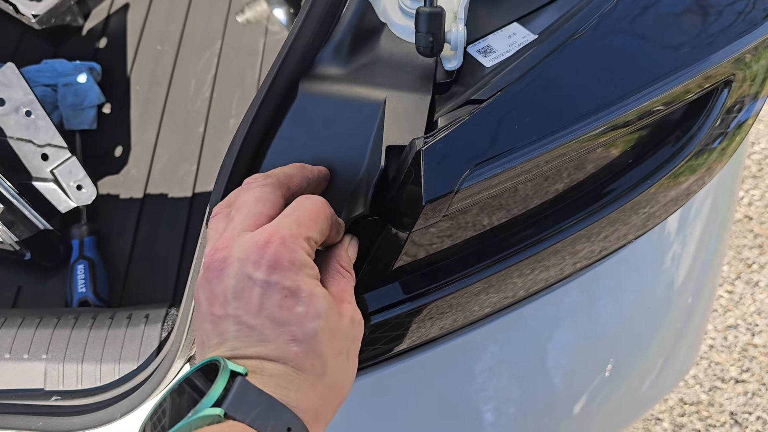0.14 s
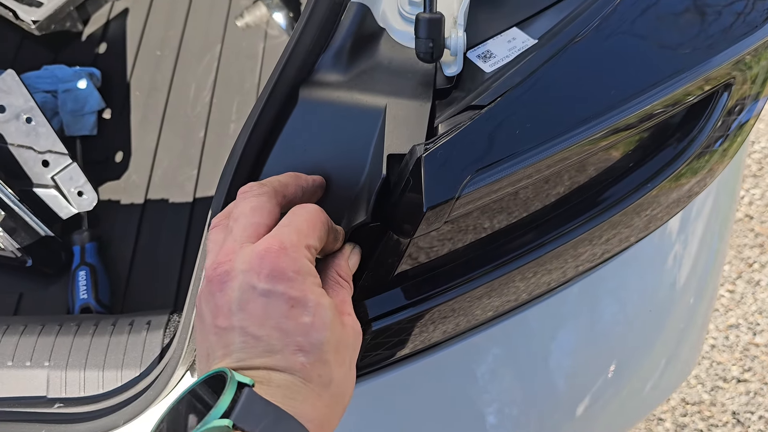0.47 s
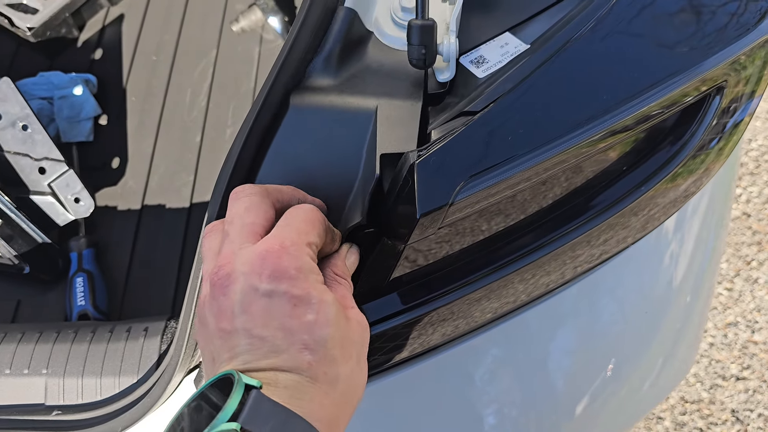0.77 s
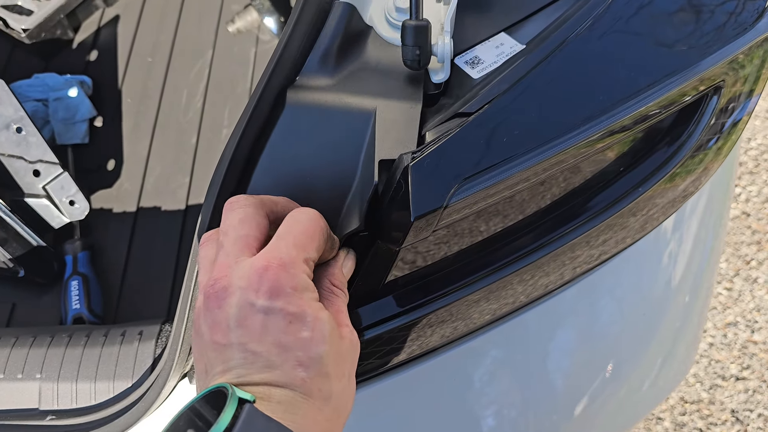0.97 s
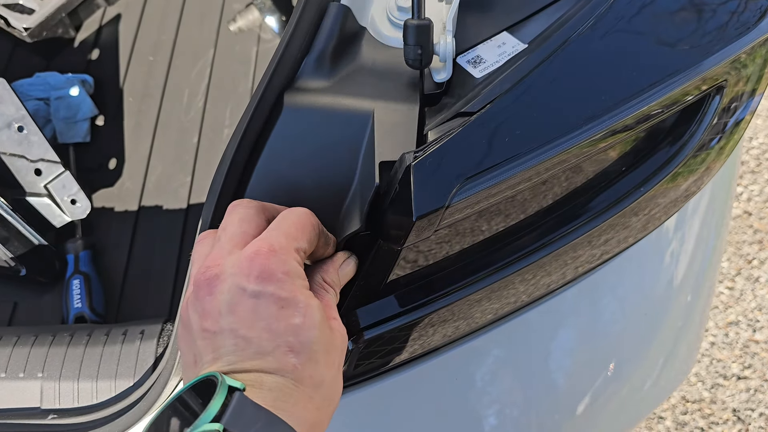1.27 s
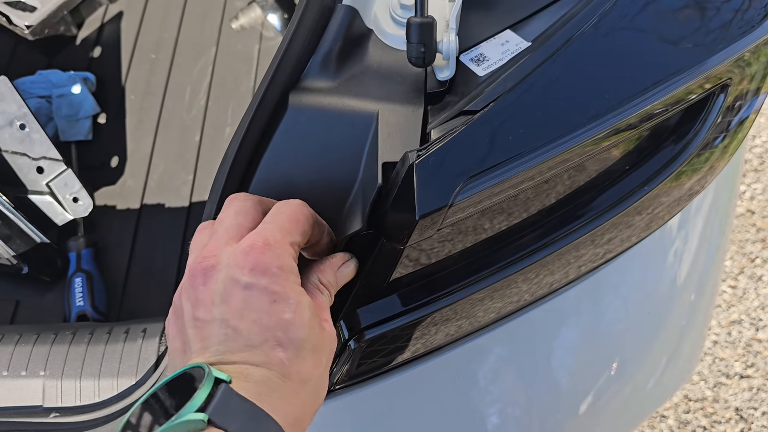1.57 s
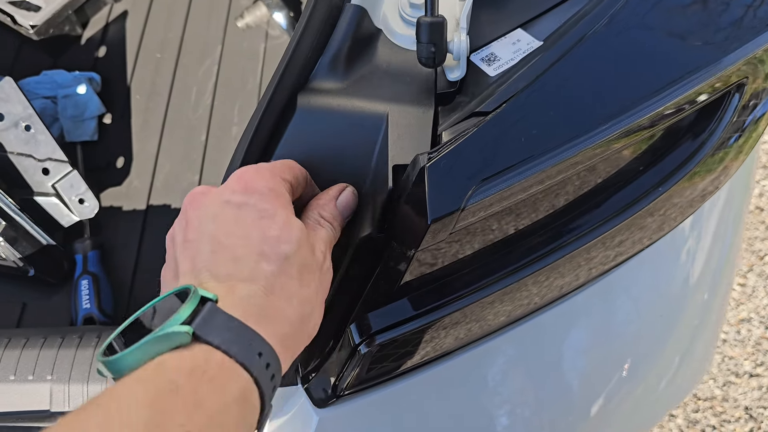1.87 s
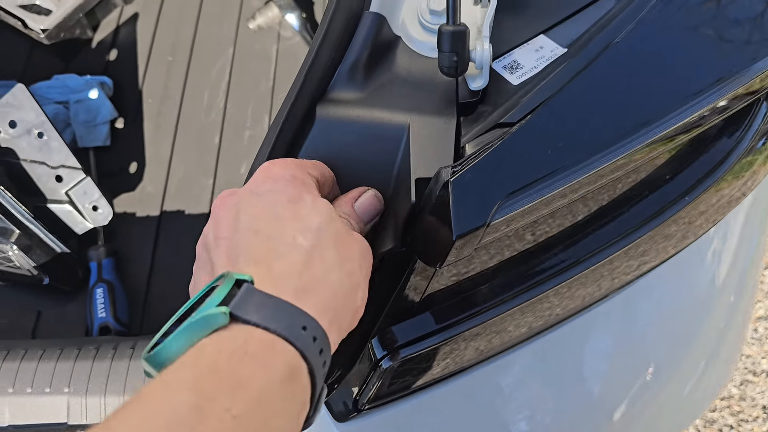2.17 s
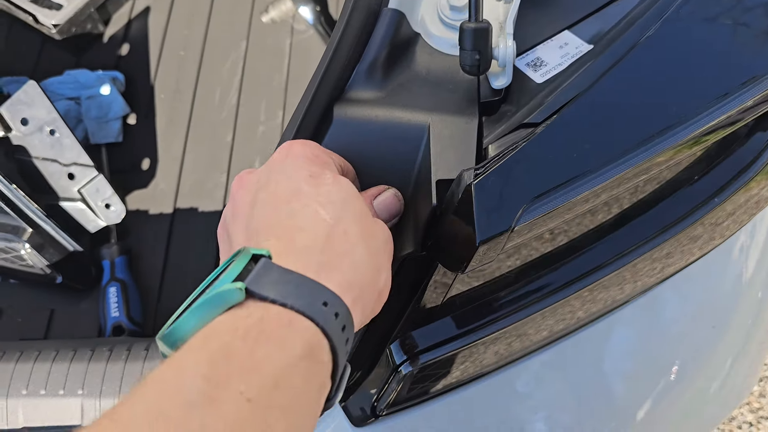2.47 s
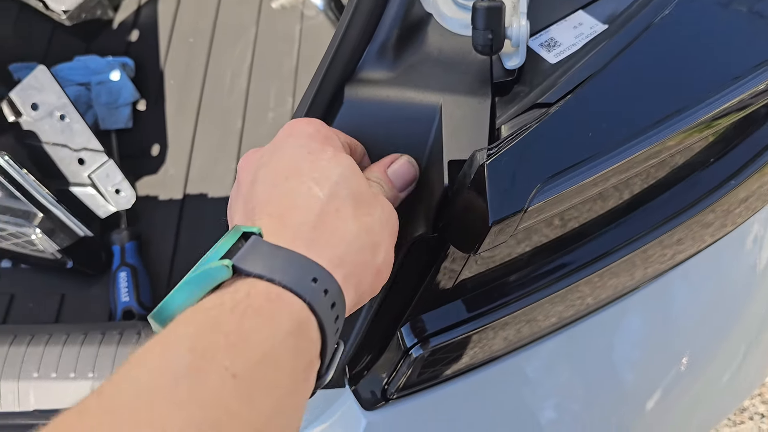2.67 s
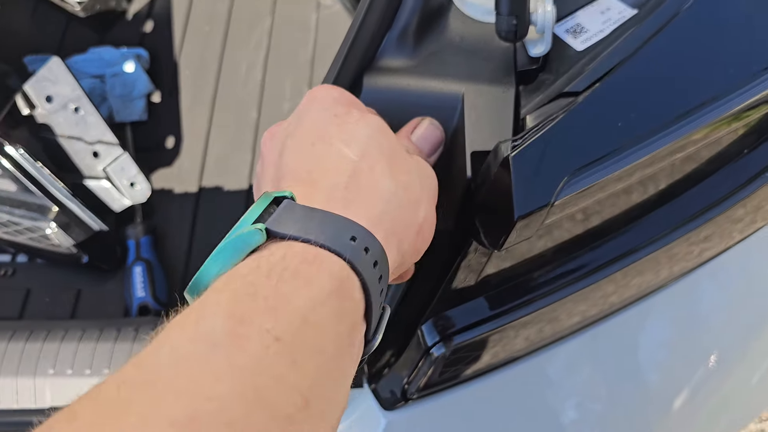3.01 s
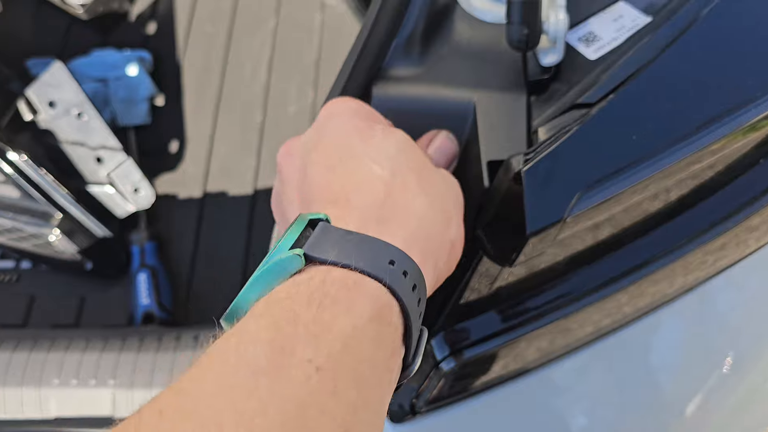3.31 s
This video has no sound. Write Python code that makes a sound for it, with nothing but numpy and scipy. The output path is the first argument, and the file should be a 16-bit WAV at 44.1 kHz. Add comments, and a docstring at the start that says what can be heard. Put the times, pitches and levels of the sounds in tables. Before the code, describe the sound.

Close to a phone at an open car boot, plastic trim knocks, creaks and rubs in bursts, then pauses before a sharp, loud clip click with a hollow thump; distant dove and songbird outdoors.

```python
"""Plastic trim pressed into a car boot

Outdoors at the open boot of a car, a hand presses a plastic trim cover into its clips, close to a phone.
Thumps and clicks are noise bursts ringing sets of dying modes; skin rubbing plastic is swelling, grainy hiss.
A dove and a songbird, wavering sines with echo, call far off over a low outdoor rumble of shaped noise."""
import sys
import numpy as np
from scipy import signal
from scipy.fft import rfft, irfft
from scipy.io import wavfile
from scipy.ndimage import uniform_filter1d

SR = 44100
rng = np.random.default_rng(int(sys.argv[2]) if len(sys.argv) > 2 else 0)


def put_to_file(sound):
    """Save the sound as 16-bit audio at rate SR, in the file named by the first command-line argument."""
    columns = np.atleast_2d(sound).T  # one column per channel
    safe = np.clip(columns, -1, 1)
    whole_steps = np.round(safe * 32767)
    wavfile.write(sys.argv[1], SR, whole_steps.astype(np.int16))


def volts_from_decibels(level):
    """Turn decibel levels (scalar or array-like) into linear amplitude factors."""
    exponent = np.asarray(level, float) / 20
    return 10 ** exponent


N = 152145


def evened(x):
    """Scales to rms 1."""
    return x / np.sqrt(np.mean(x ** 2) + 1e-20)


def slow_drift(count, width):
    """Twice-smoothed noise at rms 1, for slow wandering."""
    return evened(uniform_filter1d(uniform_filter1d(rng.standard_normal(count), width), width))


def read(points, hz):
    """Reads a table of values by frequency on a log axis."""
    f, value = np.transpose(points)
    return np.interp(np.log(hz + 1), np.log(f + 1), value)


def coloured(x, points):
    """Filters x by the spectrum in a table."""
    hz = np.fft.rfftfreq(x.shape[-1], 1 / SR)
    return irfft(rfft(x) * volts_from_decibels(read(points, hz)), x.shape[-1])


def tilted(x, slope_db):
    """Brighter or duller: a slope in dB per octave about 4 kHz, level outside 1 to 16 kHz."""
    return coloured(x, [(1000, -2 * slope_db), (16000, 2 * slope_db)])


def add(mix, s, sound, pan_db):
    """Mixes a sound in at time s; positive pan_db leans left."""
    part = mix[:, round(s * SR):][:, :len(sound)]
    part += volts_from_decibels([[pan_db / 2], [-pan_db / 2]]) * sound[:part.shape[1]]


# spectrum of the outdoor floor: pitch_hz, relative_level_db (per Hz)
AIR_SPECTRUM = [(12, -54), (20, -23), (35, -15), (60, 12), (117, -23), (151, -11), (402, -26), (1300, -35),
                (1850, -38), (2560, -39), (3400, -46), (15000, -61.5), (16300, -122)]
# rise and fall of the low rumble: time_s, level_db (only departures from the mean count)
RUMBLE_LEVEL = [(0.0, -63.5), (0.5, -61), (0.69, -61), (0.93, -61.5), (1.16, -55), (1.29, -58), (1.55, -65),
                (3.08, -60.5), (3.45, -61.5)]
# likeness of left and right: pitch_hz, correlation (-1 to 1)
LIKENESS = [(60, 0.99), (180, 0.95), (550, 0.28), (1650, -0.1), (4970, -0.25), (15000, 0.0049)]
# lean of the floor: pitch_hz, left_over_right_db
AIR_LEAN = [(60, 1.5), (240, 0.5), (950, 1), (3770, -3.5), (15000, 11.5)]
AIR_DB, PATCH_DB, SWELL_DB = -53, 1.0, 0.3  # overall rms; unevenness in time and pitch; slow swell


def air():
    """Outdoor floor: distant traffic rumble, wash and faint hiss, as patchy noise shaped in time and pitch."""
    frames, hz = N // 256 + 5, np.fft.rfftfreq(1024, 1 / SR)
    a, b, c, d, patches = rng.standard_normal((frames, 513, 5)).T
    patches = evened(uniform_filter1d(uniform_filter1d(patches, 10, 0), 12, 1))
    swell = evened(uniform_filter1d(rng.standard_normal(frames), 30))

    s, db = np.transpose(RUMBLE_LEVEL)
    change_db = np.interp(np.arange(frames) * 256 / SR, s, db) - db.mean()
    rumble = change_db / (1 + (hz[:, None] / 150) ** 2)  # mostly below 150 Hz

    same = np.clip(read(LIKENESS, hz), -1, 1)[:, None]
    left = a + 1j * b
    right = same * left + np.sqrt(1 - same ** 2) * (c + 1j * d)
    lean = volts_from_decibels(read(AIR_LEAN, hz)[:, None] / 2)
    z = np.array([left * lean, right / lean])
    z *= volts_from_decibels(read(AIR_SPECTRUM, hz)[:, None] + PATCH_DB * patches + SWELL_DB * swell + rumble)
    floor = signal.istft(z, nperseg=1024, noverlap=768)[1][:, :N]
    return volts_from_decibels(AIR_DB) * evened(floor)


def whistles(calls):
    """Near-pure gliding sines with soft 15 ms ends; each call is a list of (s, Hz, dB) points."""
    out = np.zeros((2, N))
    waver = 1 + 0.009 * slow_drift(N, 400)  # share by which the pitch wavers
    for call in calls:
        s, hz, db = np.transpose(call)
        t = np.arange(s[0], s[-1], 1 / SR)
        ends = np.clip(np.minimum(t - s[0], s[-1] - t) / 0.015, 0, 1)
        pitch = np.interp(t, s, hz) * waver[round(s[0] * SR):][:len(t)]
        tone = np.sqrt(2) * np.sin(2 * np.pi * np.cumsum(pitch) / SR)
        add(out, s[0], ends * volts_from_decibels(np.interp(t, s, db)) * tone, 1.0)
    return out


# songbird notes far off, before flutter: start_s, length_s, first_pitch_hz, last_pitch_hz, level_db
SONG_NOTES = [(.33, .05, 2130, 2200, -79), (.37, .06, 2500, 2400, -76), (.44, .11, 2380, 2450, -82),
              (.575, .095, 2660, 2640, -70), (.665, .055, 2850, 2200, -68), (.69, .1, 2430, 2500, -75),
              (.76, .055, 2980, 3020, -72), (.93, .08, 2700, 2750, -72), (2.405, .055, 2740, 2560, -72),
              (2.49, .045, 2530, 2500, -72), (2.555, .05, 2660, 2680, -72), (2.6, .045, 2450, 2260, -72),
              (2.82, .12, 2680, 2690, -70), (2.92, .04, 2500, 2270, -75), (2.96, .07, 2400, 2550, -75),
              (3.0, .18, 2680, 2630, -77)]


def songbird():
    """Short whistled notes, each gliding from its first pitch to its last."""
    notes = []
    for s, length, first_hz, last_hz, db in SONG_NOTES:
        notes.append([(s, first_hz, db), (s + length, last_hz, db)])
    return whistles(notes)


# dove coos far off, before flutter; each coo is a list of points: time_s, pitch_hz, level_db
DOVE_COOS = [
    [(.69, 514, -60), (.735, 505, -64), (.755, 587, -57.5), (.81, 598, -58.5), (.88, 480, -69)],
    [(1.53, 480, -64), (1.6, 492, -62), (1.75, 490, -61), (1.84, 480, -66)],
    [(2.74, 482, -66), (2.8, 488, -61), (2.94, 478, -64), (3.0, 480, -70), (3.15, 465, -70)],
]


def dove():
    """Low whistled coos whose pitch and level glide from point to point."""
    return whistles(DOVE_COOS)


def lingering(x, table):
    """Echo tail of sparse random taps, each band dying at its own speed (t60 by pitch)."""
    taps = np.zeros((2, SR))
    at = np.arange(160, SR - 20, 20) + rng.integers(0, 20, (2, (SR - 161) // 20))
    np.put_along_axis(taps, at, rng.choice([-1., 1.], at.shape), 1)
    taps[1] = 0.95 * taps[0] + 0.3 * taps[1]  # the two sides are much alike
    hz, t, z = signal.stft(taps, SR, nperseg=256)
    tail = signal.istft(z * volts_from_decibels(-60 * t / read(table, hz)[:, None]), SR, nperseg=256)[1]
    return signal.fftconvolve(x, tail / np.linalg.norm(tail, axis=1)[:, None], axes=1)[:, :N]


def far_birds():
    """Distant calls waver in level on the way and arrive with an echo."""
    song = songbird() + dove()
    song = song * volts_from_decibels(2.0 * slow_drift(N, 600))  # flutter, dB rms
    return song + volts_from_decibels(-2.5) * lingering(song, [(500, 0.6), (3000, 0.6)])  # t60 0.6 s throughout


# open boot ringing on: pitch_hz, t60_s
BOOT_DECAY = [(150, 0.43), (500, 0.13), (1500, 0.1), (4000, 0.085), (12000, 0.049)]


def boot(trim):
    """The open boot rings on after the close sounds, lows longest."""
    return volts_from_decibels(-11.5) * lingering(trim, BOOT_DECAY)


# skin sliding and plastic creeping, close by, before tilt and swell:
# start_s, length_s, level_db, rise_share (of the length), tilt_db_per_octave
RUB_SLIDES = [(0.0, 0.13, -64, 0.36, -5.3), (0.496, 0.048, -67, 0.43, 1.5), (0.58, 0.073, -64, 0.48, 0.5),
              (0.677, 0.035, -63, 0.37, 0.5), (0.755, 0.033, -62.5, 0.53, 0.5),
              (0.874, 0.042, -49.5, 0.69, -1.3), (0.912, 0.017, -40, 0.53, -2.5),
              (1.016, 0.033, -48.5, 1, -4.5), (1.043, 0.058, -50, 1, -2.5), (1.123, 0.15, -59.5, 0.56, -2),
              (1.256, 0.081, -46, 0.86, -3), (1.31, 0.0073, -34, 0.17, 5.8), (1.449, 0.05, -59, 0.3, -5.5),
              (1.546, 0.32, -71.5, 0.23, -10), (1.682, 0.091, -44.5, 0.78, 1),
              (1.774, 0.12, -52.5, 0.63, 0), (1.891, 0.065, -58, 0.37, 3.3), (2.646, 0.088, -57, 0.28, 4),
              (2.797, 0.068, -52.5, 0.53, 3), (2.842, 0.078, -60, 0.23, -2.2),
              (3.246, 0.098, -50, 0.17, -3), (3.265, 0.03, -49.5, 1, 0), (3.311, 0.34, -56, 0.71, 0.3)]
# spectrum of the rubbing hiss: pitch_hz, relative_level_db (per Hz)
RUB_SPECTRUM = [(110, -25), (200, -10), (400, 2), (900, -9.5), (1340, 1), (1750, -9), (2350, -0.5),
                (2900, -1), (3700, -10.5), (8000, -18.5), (14700, -26), (16300, -45)]
GRIP_DB, SLIPS_PER_S = 2.6, 700  # uneven grip, and rate of sudden small slips


def rubs():
    """Scratchy hiss of small slips that swells and fades with each slide."""
    grip = volts_from_decibels(GRIP_DB * evened(uniform_filter1d(rng.standard_normal(N), size=200)))
    slips = (rng.random(N) < SLIPS_PER_S / SR) * rng.exponential(1, N)
    grip = grip + signal.lfilter([1], [1, -0.95], slips)
    a, b = rng.standard_normal((2, N))
    hiss = evened(coloured(grip * np.array([a, 0.8 * a + 0.6 * b]), RUB_SPECTRUM))  # ports partly differ
    out = np.zeros((2, N))
    for s, length, db, rise, slope_db in RUB_SLIDES:
        n, at = round(length * SR), round(max(s, 0) * SR)
        peak = np.clip(rise, 0.05, 0.95)
        swell = np.sin(np.pi / 2 * np.interp(np.arange(n) / n, [0, peak, 1], [0, 1, 0]))
        out[:, at:at + n] += volts_from_decibels(db) * swell[:N - at] * tilted(hiss[:, at:at + n], slope_db)
    return out * volts_from_decibels([[0.75], [-0.75]])  # leans left


DETUNE, UNEVEN_DB = 0.038, 2.5  # blows land at different places: spread of mode pitch (share) and level
REACH_OCTAVES = 0.68  # a thump favours the modes near its centre


def ring(modes, drive_s, centre_hz=None):
    """A short dying shake rings a set of modes; loudest stretch at rms 1."""
    t = np.arange(SR // 3) / SR
    hz, db, t60 = np.repeat(np.transpose(modes), 2, axis=1)[:, :, None]  # each mode is a close pair
    band = [1.04 * hz.min(), hz.max()]
    if centre_hz:
        db = db - 6 * (np.log2(hz / centre_hz) / REACH_OCTAVES) ** 2
        band = [centre_hz / 1.63, centre_hz * 1.9]
    uneven, detune = rng.standard_normal((2, len(hz), 1))
    fading = volts_from_decibels(db + UNEVEN_DB * uneven - 60 * t / t60)
    body = (fading * np.sin(2 * np.pi * hz * (1 + DETUNE * detune) * t)).sum(0)

    u = t[:3000] / drive_s
    shake = rng.standard_normal(3000) * u * np.exp(-2 * u)
    sound = signal.oaconvolve(body, shake)[:len(t)]
    sound = signal.sosfilt(signal.butter(2, band, "bandpass", fs=SR, output="sos"), sound)
    stretch = round(SR * (drive_s + 1 / (centre_hz or hz.min())))
    return sound / np.sqrt(uniform_filter1d(sound ** 2, stretch).max())


# hollow cover and body panel, low modes before detuning: pitch_hz, relative_level_db, t60_s
HOLLOW_MODES = [(60, 20, 0.6), (131.8, 25, 0.041), (169, -5, 0.49), (173, 1, 0.21), (219.9, 13.5, 0.1),
                (244, 11.5, 0.17), (293, 13.5, 0.057), (359.7, -4.5, 0.14), (405, 11.5, 0.12),
                (471, 13.5, 0.11), (546, 0, 0.21)]
# thumps and pushes: start_s, level_db, centre_hz, push_s (held within 1 to 35 ms)
THUMP_BLOWS = [(0.091, -39, 227, 0.0071), (0.745, -51, 243, 0.02), (.894, -29.5, 370, 0.0012),
               (0.913, -32, 278, 0.0048), (0.931, -35.5, 237, 0.0063), (1.005, -39.5, 447, 0.0048),
               (1.092, -34.5, 254, 0.0043), (1.107, -22.5, 413, 0.00085), (1.117, -31.5, 198, 0.005),
               (1.265, -38, 416, 0.0093), (1.301, -23, 262, 0.0047), (1.316, -30.5, 419, 0.0079),
               (1.354, -38, 210, 0.0085), (1.457, -35, 260, 0.0078), (1.645, -44, 250, 0.023),
               (1.738, -38.5, 297, 0.0049), (1.753, -33, 342, 0.011), (1.768, -38, 192, 0.0089),
               (1.894, -32.5, 234, 0.021), (1.953, -38, 295, 0.0066), (1.974, -44.5, 205, 0.006),
               (2.009, -45.5, 232, 0.017), (2.379, -36.5, 255, 0.0027), (2.645, -48, 238, 0.015),
               (2.687, -51, 227, 0.006), (2.823, -53, 236, 0.038), (2.942, -46, 236, 0.014),
               (3.208, -24, 377, 0.012), (3.212, -35, 60, 0.0034), (3.217, -23.5, 205, 0.0083),
               (3.233, -20, 192, 0.0027), (3.269, -36, 138, 0.0024)]


def thumps():
    """Pushes of the hand thump the hollow cover and panel; longer pushes drive the modes for longer."""
    out = np.zeros((2, N))
    for s, db, centre_hz, push_s in THUMP_BLOWS:
        sound = ring(HOLLOW_MODES, np.clip(push_s, 0.001, 0.035), centre_hz)
        add(out, s, volts_from_decibels(db) * sound, 0.5)
    return out


# plastic plate, middle modes before detuning: pitch_hz, relative_level_db, t60_s
PLATE_MODES = [(657, 4.5, 0.039), (779.5, 12.5, 0.047), (1022, -10, 0.09), (1087, 8.5, 0.015),
               (1267, 8.5, 0.029), (1657, 3.5, 0.013), (1820, 4.5, 0.004)]
# clip and edges, high modes before detuning: pitch_hz, relative_level_db, t60_s
EDGE_MODES = [(2240, -5, .009), (2650, -5, .009), (3100, -1, .01), (3600, 0, .01), (4150, 0, .01),
              (5300, -8, .007), (6600, -9, .006), (8200, -11, .005)]
# unpitched crack of a click: pitch_hz, relative_level_db (per Hz)
CRACK_SPECTRUM = [(900, -18), (1500, -19.5), (2300, 0), (3700, -2.5), (5200, -13), (8500, -12.5),
                  (12100, -26.5), (15500, -17.5), (16300, -47)]
# clicks: start_s, plate_level_db, snap_level_db (edge ring, before tilt),
# snap_left_over_right_db, snap_tilt_db_per_octave
CLICK_BLOWS = [(0.035, -41, -47, 6, -3), (0.097, -52, -76, 8, 2), (0.312, -61, -84, 0, 0.1),
               (0.707, -60, -67, 2.0, -13), (0.894, -30, -44.5, 10, -2), (0.927, -35.5, -42, 7, -8),
               (1.002, -40.5, -54.5, 2, -6.5), (1.09, -41.5, -50, 10.5, -4), (1.105, -31.5, -44.5, 5, -4),
               (1.265, -42.5, -58.5, 5, -20.5), (1.293, -38.5, -49.5, 9, -1.5),
               (1.316, -35.5, -30, 9.5, -3.5), (1.355, -36.5, -47.5, 3.5, -3.5), (1.459, -61, -63, -7, -7),
               (1.472, -48, -68, 9.5, -3), (1.737, -37.5, -37, 10.5, 1), (1.754, -31.5, -36.5, 1.5, -3.5),
               (1.953, -39, -46, 7.5, -9), (2.377, -41, -62.5, 5, -5), (2.941, -52.5, -78, 4.5, -7),
               (3.2066, -16, -15, 8, -4), (3.216, -37, -40, -20, -9), (3.229, -27, -32, -4, -1.5)]
RATTLE_S, SNAP_S = 0.0025, 0.002  # how long a blow drives the plate and the edges
CRACK_DB, CRACK_T60 = 9.5, 0.022  # crack against the edge ring, and its decay in s
PLATE_PAN_SHARE = 0.76  # the plate leans less than the snap


def clicks():
    out, t = np.zeros((2, N)), np.arange(4000) / SR
    for s, plate_db, snap_db, pan_db, slope_db in CLICK_BLOWS:
        add(out, s, volts_from_decibels(plate_db) * ring(PLATE_MODES, RATTLE_S), PLATE_PAN_SHARE * pan_db)
        crack = evened(coloured(rng.standard_normal(4000), CRACK_SPECTRUM))
        crack_shape = np.minimum(t / SNAP_S, 1) * volts_from_decibels(CRACK_DB - 60 * t / CRACK_T60)
        snap = ring(EDGE_MODES, SNAP_S)
        snap[:4000] += crack_shape * crack
        add(out, s, volts_from_decibels(snap_db) * tilted(snap, slope_db), pan_db)
    return out


# direct path and nearby surfaces, left port then right: delay_s, level_db (relative within a port)
NEAR_PATHS = [
    [(0.00002, 14.5), (.0009, -10.5), (.0021, -16.5), (.0045, -3)],
    [(.00021, 35), (.0013, -33.5), (.0029, 4), (.0052, -10)],
]


def near(x):
    """Direct path and first bounces reach the two microphone ports at different times."""
    k = np.arange(400)
    taps = [sum(volts_from_decibels(db) * np.sinc(k - 8 - s * SR) for s, db in port) for port in NEAR_PATHS]
    taps = np.array([p / np.linalg.norm(p) for p in taps])
    treble = signal.lfilter(*signal.butter(1, 6840, "highpass", fs=SR), taps[1])
    taps[1] += (volts_from_decibels(1) - 1) * treble  # right port up to 1 dB brighter
    return signal.oaconvolve(x, taps, axes=1)[:, 8:N + 8]


def scene():
    """Hand and trim close by, birds and air far off."""
    trim = near(thumps() + clicks() + rubs())
    return air() + far_birds() + boot(trim) + trim


def low_pass(x):
    """Removes everything above the highest recorded frequency."""
    return signal.sosfilt(signal.butter(12, 16660, fs=SR, output="sos"), x)


def record(dry):
    """The microphone drops the deepest bass, below about 41 Hz."""
    mix = signal.sosfilt(signal.butter(2, 41.3, "highpass", fs=SR, output="sos"), dry)
    return low_pass(mix)


dry = scene()
out = record(dry)
put_to_file(out)
```